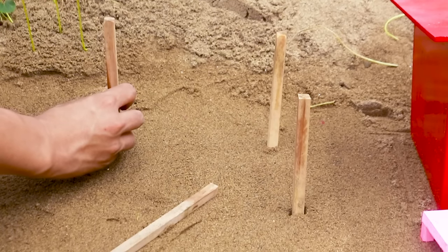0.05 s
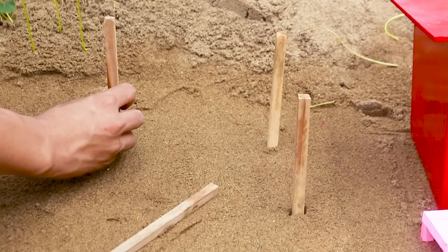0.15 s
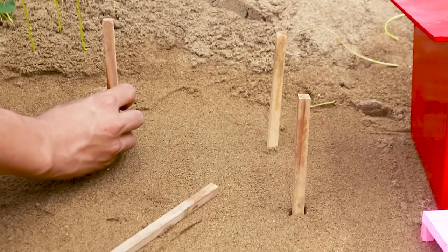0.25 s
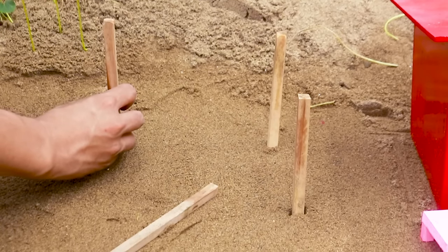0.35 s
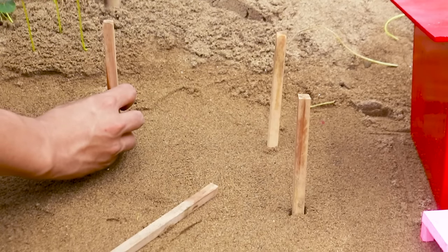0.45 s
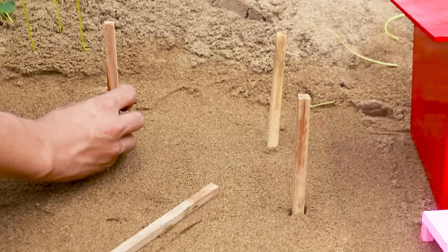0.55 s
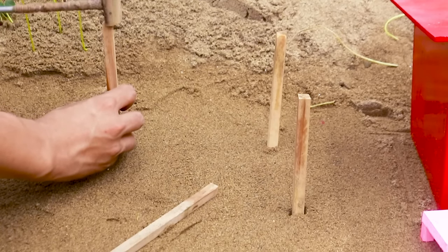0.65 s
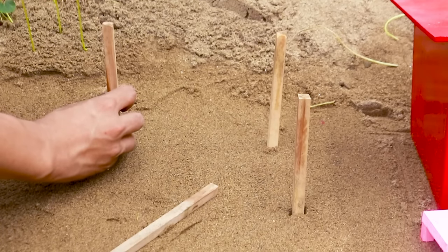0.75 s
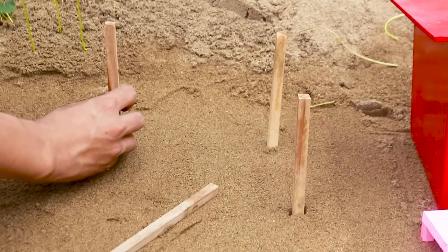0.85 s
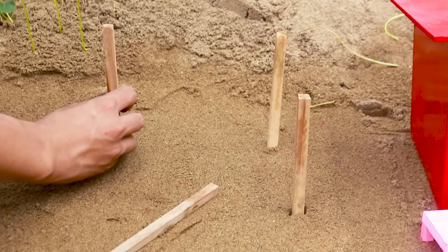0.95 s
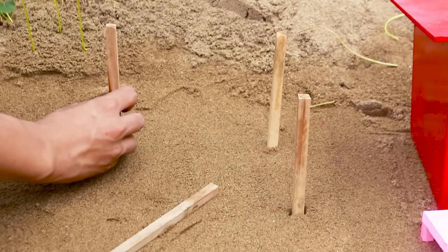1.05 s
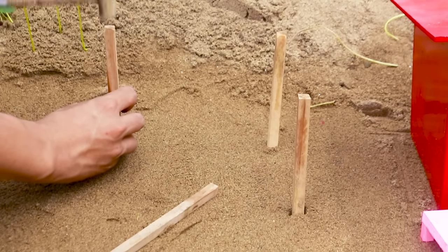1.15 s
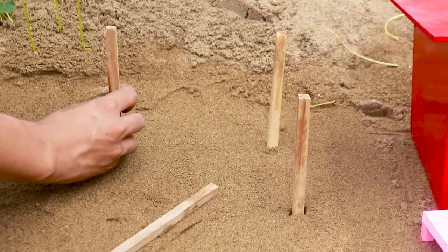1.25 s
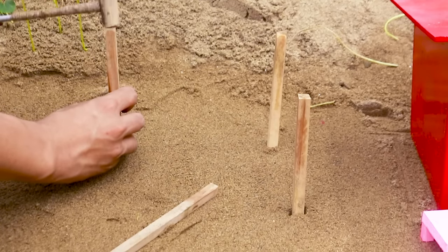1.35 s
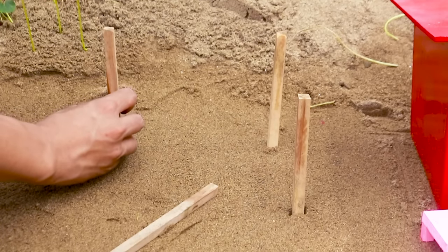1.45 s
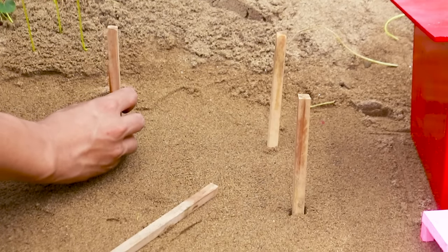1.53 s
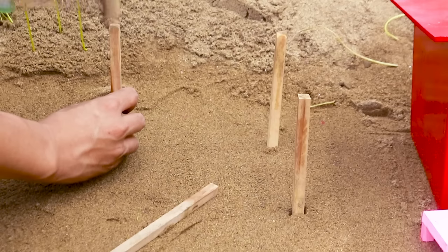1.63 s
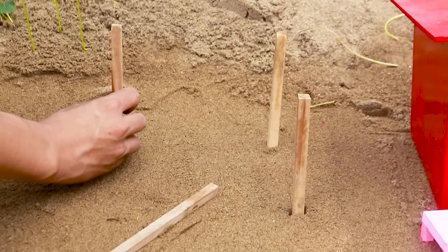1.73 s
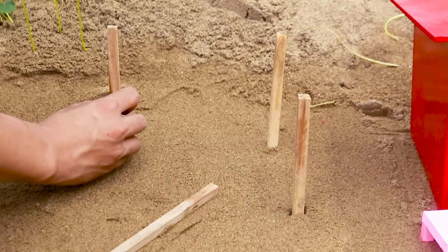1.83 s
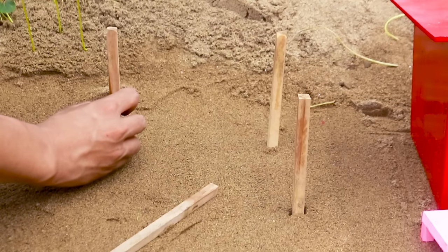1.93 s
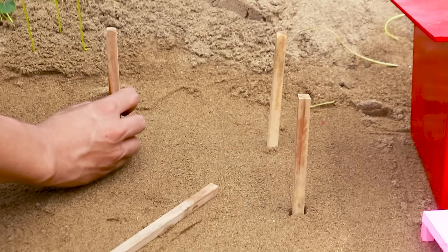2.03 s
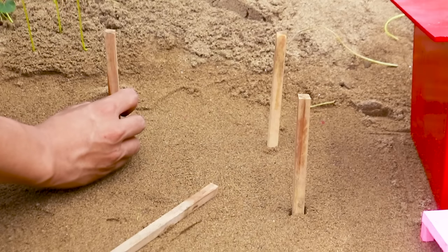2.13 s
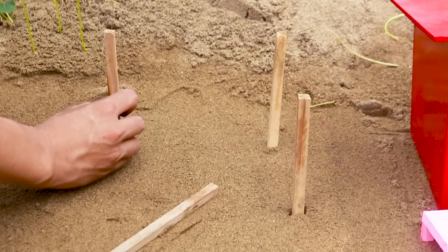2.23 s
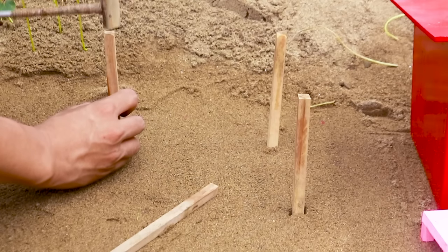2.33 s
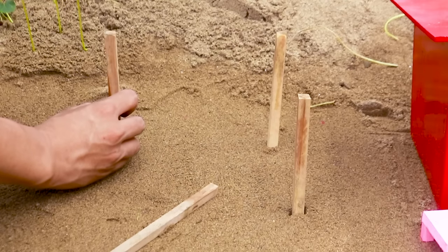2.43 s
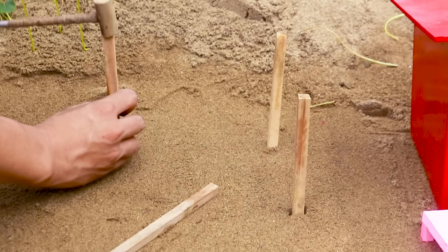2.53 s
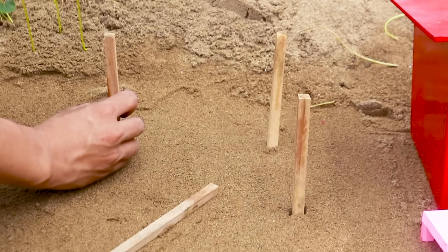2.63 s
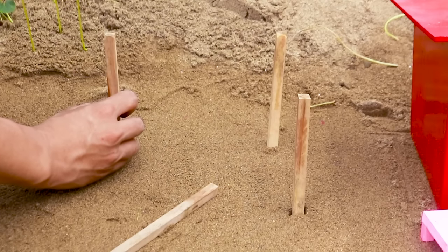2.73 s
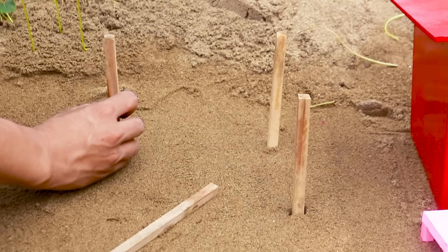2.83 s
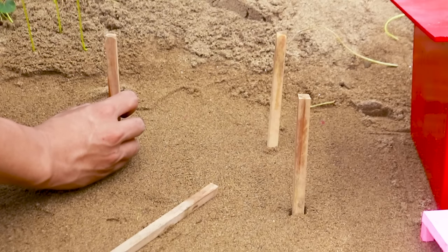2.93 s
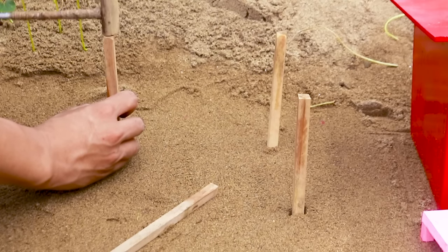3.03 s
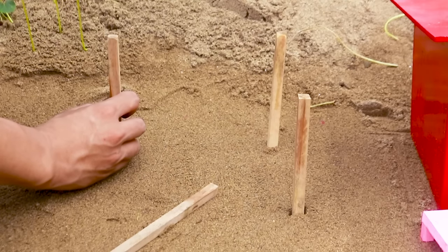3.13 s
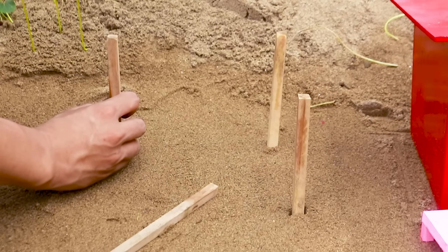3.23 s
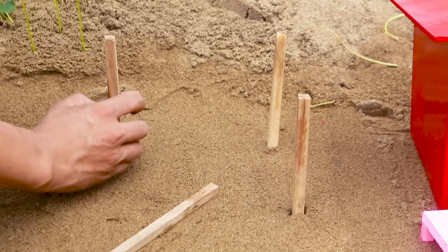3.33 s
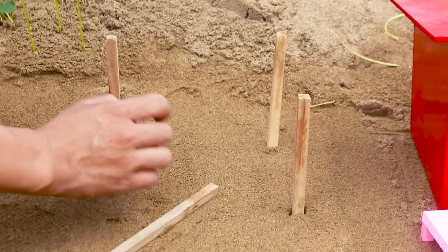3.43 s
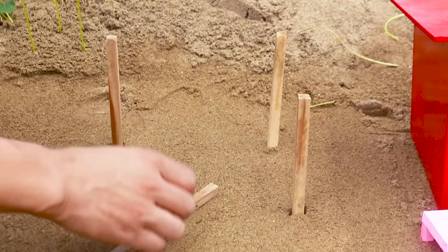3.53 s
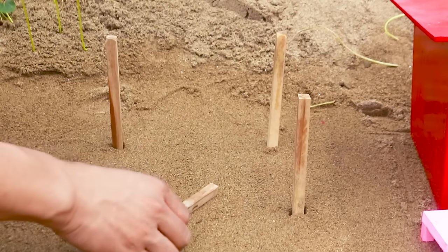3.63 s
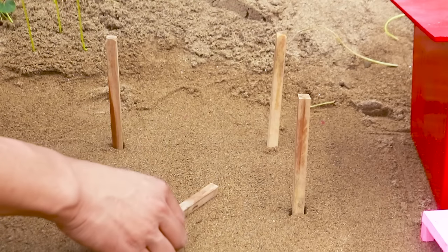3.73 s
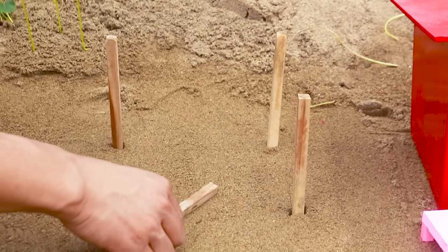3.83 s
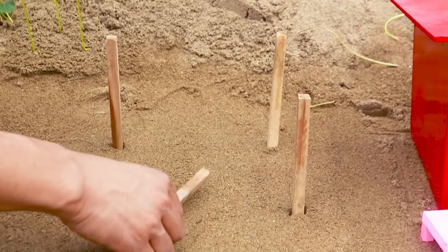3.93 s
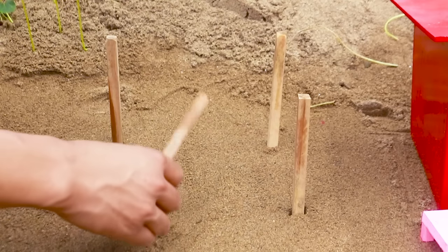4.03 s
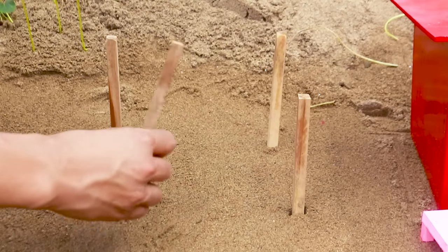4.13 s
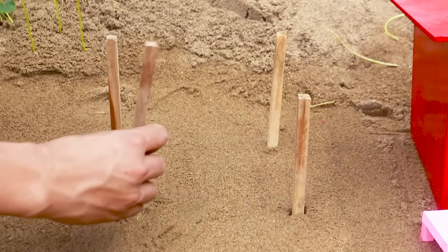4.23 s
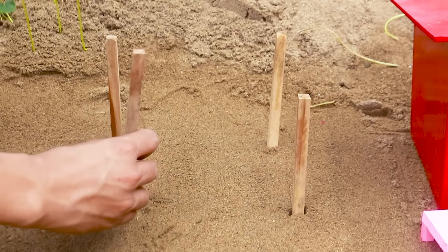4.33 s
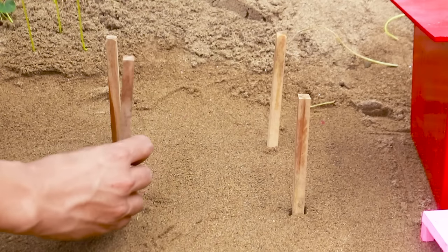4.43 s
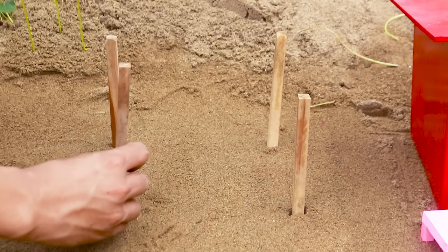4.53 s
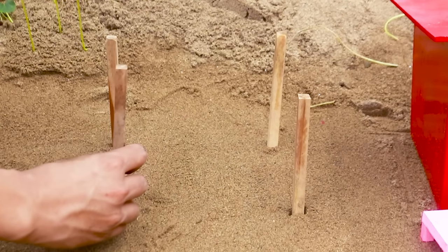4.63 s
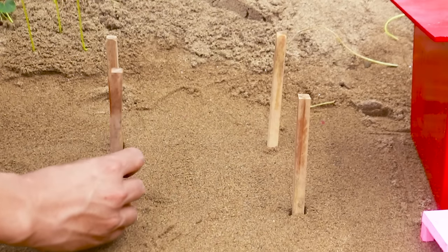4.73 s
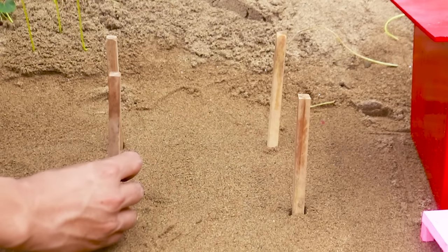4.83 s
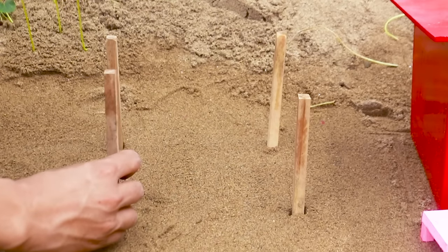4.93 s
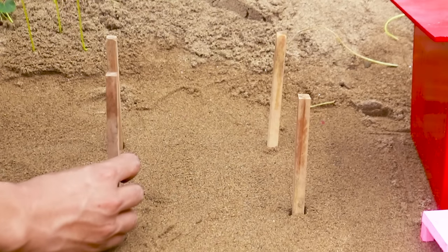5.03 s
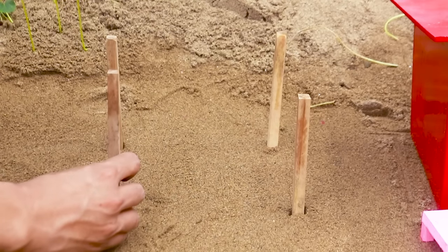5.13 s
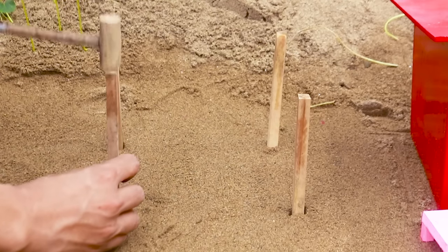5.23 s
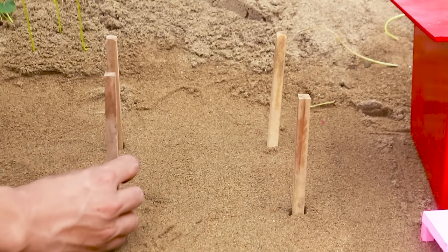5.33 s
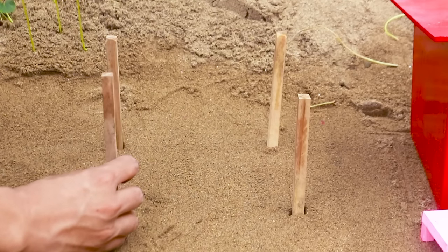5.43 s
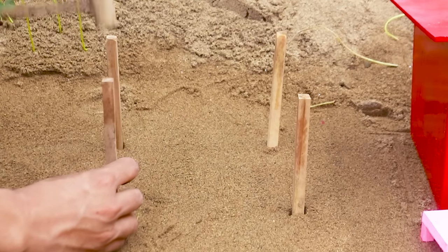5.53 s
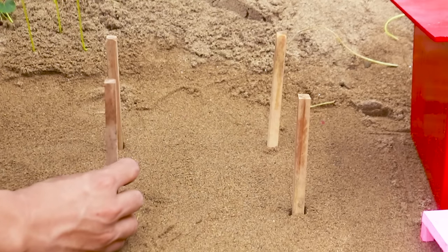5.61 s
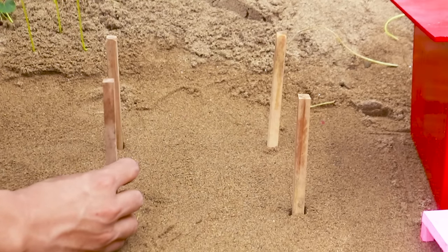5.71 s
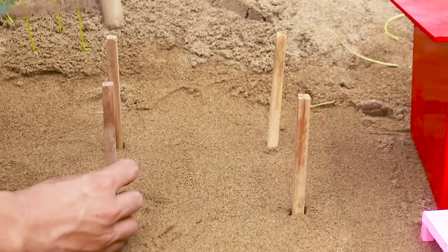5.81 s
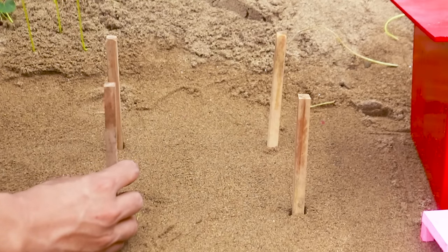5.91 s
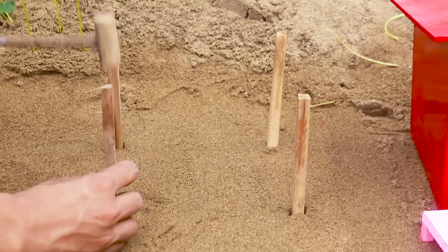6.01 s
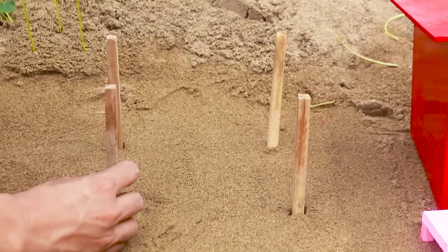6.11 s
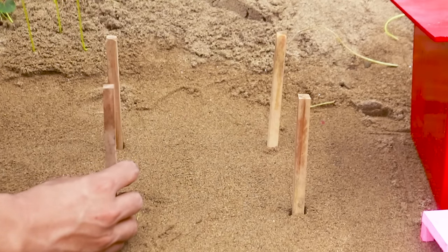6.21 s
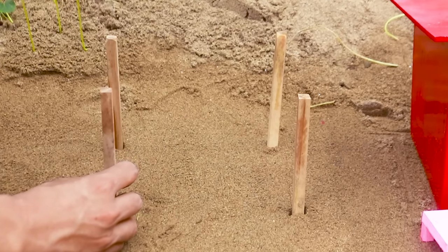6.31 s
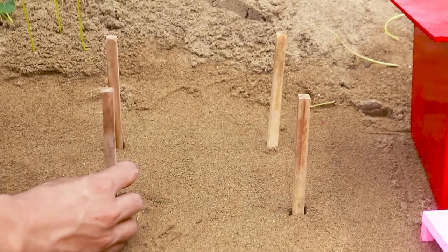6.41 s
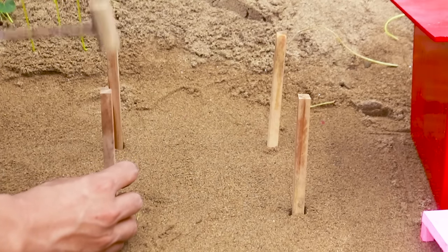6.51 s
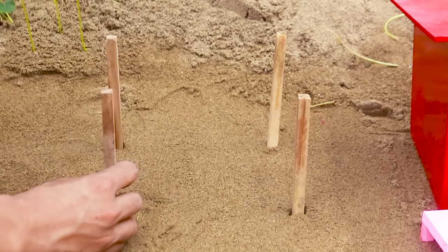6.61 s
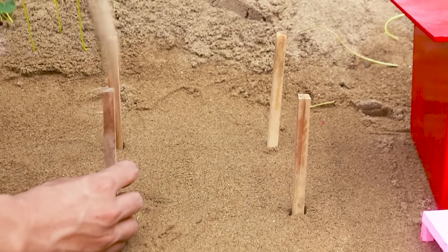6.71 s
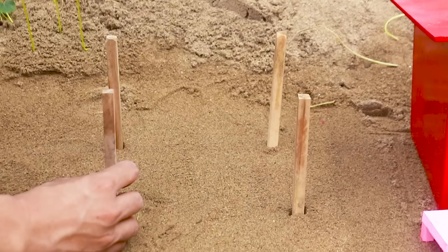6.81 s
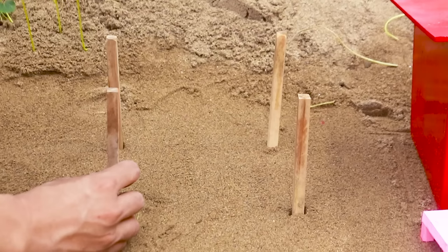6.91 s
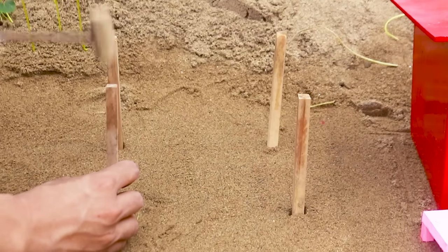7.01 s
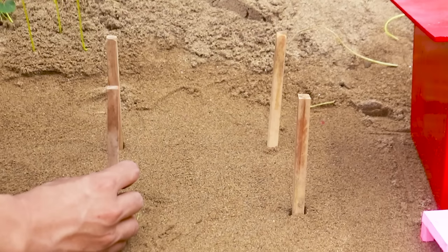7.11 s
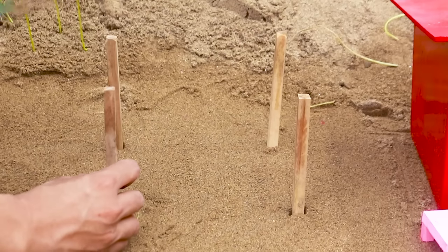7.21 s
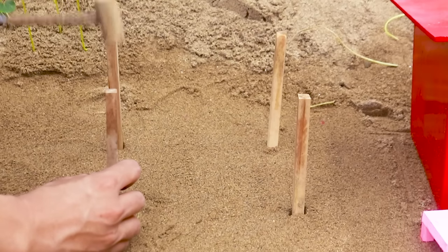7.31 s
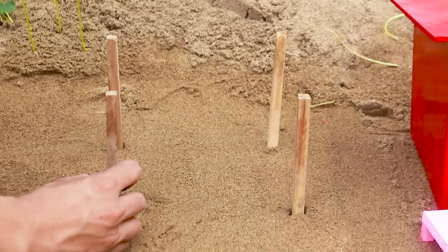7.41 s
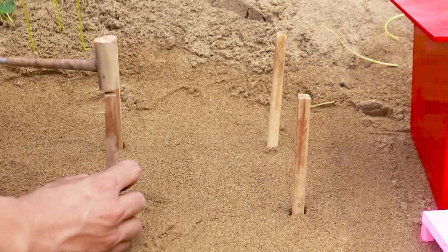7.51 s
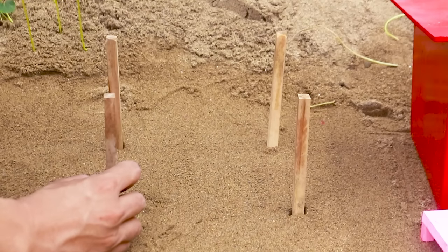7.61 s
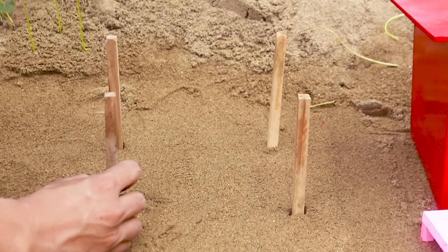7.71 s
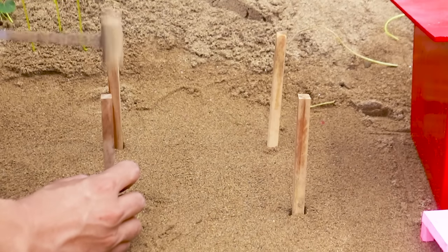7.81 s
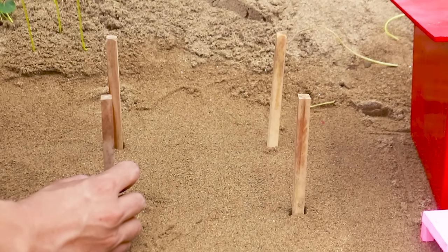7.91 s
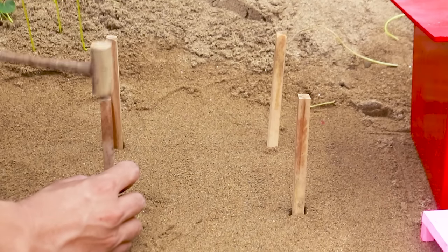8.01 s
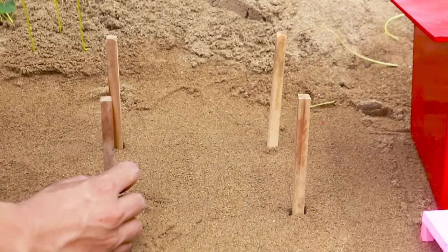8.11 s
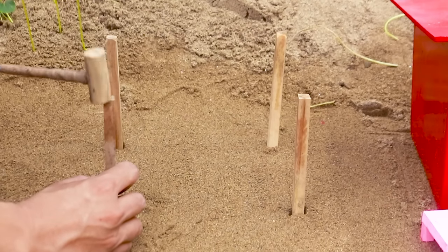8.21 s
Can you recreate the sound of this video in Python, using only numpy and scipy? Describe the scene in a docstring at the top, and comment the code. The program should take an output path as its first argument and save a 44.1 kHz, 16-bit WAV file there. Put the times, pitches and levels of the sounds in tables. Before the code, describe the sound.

Close to the microphone, a small wooden mallet raps a stake into sand, about four sharp, woody knocks a second, each with a short low thump. After three seconds it stops; faint bird whistles and distant traffic show through, with one soft knock as another stake is set down. Past five seconds the tapping resumes, a little slower to start, and runs to the end. Outdoors, wide stereo, loud peaks slightly crushed.

```python
"""Mallet on stakes in sand

A small wooden mallet taps stakes into a bed of sand, close to a microphone whose input clips softly.
Blows: noise crack, decaying sines for wood and bed, a low boom with five weaker returns, scattered noise.
Birds: swept sines whistle, narrow noise buzzes. Dry ticks and a soft knock come between.
Background: shaped noise for distant traffic and far rustle and chatter, plus two wavering hum tones.
"""
import sys
import numpy as np
from scipy import signal
from scipy.fft import rfft, irfft, next_fast_len
from scipy.io import wavfile
from scipy.ndimage import uniform_filter1d, map_coordinates

SR = 44100
rng = np.random.default_rng(int(sys.argv[2]) if len(sys.argv) > 2 else 0)


def file_out(sig):
    """Save sig as 16-bit WAV at sys.argv[1]."""
    # one column per channel
    cols = np.atleast_2d(sig).T
    # limit, then scale
    lim = np.clip(cols, -1, 1)
    pcm = np.round(lim * 32767).astype(np.int16)
    wavfile.write(sys.argv[1], SR, pcm)


N = 364266

# Blows: t/s, crack level/dB, force level/dB, click f/Hz (set by contact spot), snap level/dB (square hit)
BLOWS = [(-.006, -9, -4.5, 2880, -15), (0.2003, -12, -2.2, 1960, 5), (0.4488, -15, -6.5, 1460, -26),
         (0.6877, -8.5, -5, 1600, -20), (0.934, -11.5, -7, 1550, -18), (1.1849, -10.5, -2.5, 1940, 10),
         (1.4026, -10, -0.3, 2640, -4), (1.6213, -12, -1, 2560, -21), (2.1055, -8.5, 1, 2880, -2),
         (2.3397, -5.5, -0.7, 1510, -3), (2.5674, -7.5, -1, 1928, 2), (2.7855, -7, 1.5, 1600, -2),
         (3.0197, -5, -.5, 1537, 1.5), (5.2316, -8, -6, 1550, -16), (5.536, -12.5, -7.5, 1540, -19),
         (5.8065, -8.5, -3, 1950, 6), (6.0434, -11, .1, 2710, -3), (6.2624, -11, -1.5, 2450, -16),
         (6.5133, -7, 1.3, 1510, -8), (6.767, -5, -0.1, 1590, -3), (7.0136, -7, -0.7, 1960, 7),
         (7.2901, -7.5, 1, 2870, -12), (7.519, -10.5, .1, 2650, 0), (7.7767, -10.5, -1.5, 2450, -19),
         (8.0281, -7, 1.1, 2870, -12), (8.2415, -8.5, -1.5, 1600, -20)]
BOOM_DB_PER_FORCE_DB = 0.42
PITCH_PER_DB, PITCH_SD = 0.01, .05  # harder blows tend to ring the wood higher


def mallet():
    """Each blow drives crack, wood, bed, boom and scatter; a faint noise swells just before it."""
    out = np.zeros((2, N))
    t = np.arange(SR // 2) / SR
    low = boom(t)
    sideways = sway(t)
    same = scatter(t)  # shared by all blows: the surroundings answer much alike
    for s, crack_db, force_db, click_hz, snap_db in BLOWS:
        pitch = 1 + PITCH_PER_DB * force_db + rng.normal(0, PITCH_SD)
        strike = crack(t, snap_db) + click(t, click_hz) + 1.03 * wood(t, pitch)
        around = amp(-12.5) * same + amp(-15.0) * scatter(t)
        body = bed(t, click_hz) + sideways + around
        blow = amp(crack_db) * strike + amp(force_db) * body
        blow = blow + amp(BOOM_DB_PER_FORCE_DB * force_db) * low
        add(out, s, blow, .6)
        add_lead(out, s)
    add_bounces(out)
    return out


# Crack spectrum: f/Hz, relative level/dB
CRACK = [(200, -38.5), (600, 4.5), (1500, 4.5), (3000, -0.5), (6000, -9), (10000, -17), (14000, -33)]
# Stereo spread of crack, lead and scatter: f/Hz, left-right likeness (-1 to 1)
SPREAD = [(100, 0.62), (200, 0.21), (400, 0.7), (2000, 0.61), (5000, 0.63), (12000, 0.22)]


def crack(t, snap_db):
    """Impact noise with a fast and a slow decay; its difference adds the treble of a hard, square hit."""
    decay = amp(-60 * t / 0.0084) + 0.27 * amp(-60 * t / 0.046)
    noise = paired(rng.standard_normal((2, len(t))), CRACK, SPREAD) * decay
    snap = amp(snap_db) * np.diff(noise, prepend=0)
    return 2.46 * noise + snap


def add_lead(out, s):
    """A faint noise swells exponentially for 5 ms just before each blow."""
    lead = np.arange(-SR // 200, 0) / SR
    noise = paired(rng.standard_normal((2, len(lead))), CRACK, SPREAD)
    add(out, s + lead[0], amp(-22.5 + 60 * lead / 0.0096) * noise)


def click(t, hz):
    """Short decaying sine; the contact spot sets its pitch."""
    return 1.46 * amp(-60 * t / 0.022) * np.sin(2 * np.pi * hz * t)


# Mallet head and stake modes: f/Hz at pitch 1, mean level/dB, t60/s
WOOD = [(1576, -6, 0.065), (1694, -10.5, 0.051), (1938, -9.5, 0.089), (2512, -13, 0.07), (2922, -12, 0.073),
        (3530, -18, 0.079), (4600, -18.5, 0.051)]


def wood(t, pitch):
    """Head and stake ring as decaying sines, at new strengths each time."""
    hz, db, t60 = np.transpose(WOOD)[:, :, None]
    level_db = db + rng.normal(0, 2.3, db.shape)
    modes = amp(level_db - 60 * t / t60) * np.sin(2 * np.pi * hz * pitch * t)
    return modes.sum(0)


# Bed and surroundings, nominal modes: f/Hz, level/dB, swell time/s, t60/s
BED = [(158.95, -19.5, 0.032, 0.34), (213, -32.5, 0.051, 0.18), (259.7, -23.5, 0.058, 0.12),
       (317.8, -30, 0.045, 0.21), (368.9, -21.5, 0.048, 0.12), (393.7, -8.5, 0.0034, 0.099),
       (435.6, -25.5, 0.051, 0.16), (489.9, -23.5, 0.035, 0.09), (572, -38.5, 0.013, 0.095),
       (636, -25.5, 0.0017, 0.15), (708, -35.5, .02, 0.056), (795, -22, 0.008, 0.17),
       (861, -24, 0.004, 0.28), (943.5, -16.5, 0.023, 0.078), (992.4, -15.5, 0.0087, 0.11),
       (1100, -32.5, 0.0071, 0.043), (1208, -29, .01, 0.047)]
# Bed gain above 600 Hz against click pitch: click f/Hz, level/dB
HOLLOW = [(1700, -2), (1900, -8.5), (2000, -13), (2450, 1.5)]
BED_DETUNE_SD = .012  # share of f


def bed(t, click_hz):
    """Modes swell, then decay; pitch and strength shift a little at each blow."""
    hz, db, swell_s, t60 = np.transpose(BED)[:, :, None]
    envelope = amp(db - 60 * t / t60 + 60 * swell_s / t60) * (1 - np.exp(-(t / swell_s) ** 2))
    strength = amp(rng.normal(0, 2, hz.shape) + along(HOLLOW, click_hz) * (hz > 600))
    tuned_hz = hz * rng.normal(1, BED_DETUNE_SD, hz.shape)
    return (strength * envelope * np.sin(2 * np.pi * tuned_hz * t)).sum(0)


# Cross modes: f/Hz, level/dB, t60/s
SWAY = [(133, -23.5, .35), (165, -18.5, 0.28), (216, -27, .25), (300, -32, .2)]


def sway(t):
    """Cross modes push left and right in opposite directions."""
    swell = 1 - np.exp(-(t / 0.028) ** 2)
    modes = sum(amp(db - 60 * t / t60) * swell * np.sin(2 * np.pi * hz * t) for hz, db, t60 in SWAY)
    return [[1], [-1]] * modes


# Thumps inside the boom: middle t/s after the blow, f/Hz, level/dB, length/s, L-R/dB
THUMPS = [(.007, 374, -12, .012, 1), (.006, 614, -17.5, 0.024, -4.5), (.022, 222, -16.5, .014, -1),
          (.042, 185, -9, 0.011, 5), (.06, 241, -21, 0.019, 3.5), (0.091, 150, -23, 0.0089, 11.5),
          (.1, 63.9, -29, 0.23, .5)]
BOOM_MIDDLE_S, BOOM_HZ, BOOM_DB, BOOM_LENGTH_S, BOOM_PAN_DB = 0.0329, 100.3, -18, 0.088, 2
RETURN_S, RETURN_GAP_S, RETURN_LENGTH_S = .1, .05, 0.06
RETURN_LOSS_DB, RETURN_PITCH_RATIO = 3, 0.933  # per return; pitch sinks from the second on


def boom(t):
    """Low swell through the ground, five weaker returns that sink in pitch, and short thumps."""
    swells = [(BOOM_MIDDLE_S, BOOM_HZ, BOOM_DB, BOOM_LENGTH_S, BOOM_PAN_DB)]
    for k in range(5):
        hz = BOOM_HZ * RETURN_PITCH_RATIO ** k
        db = BOOM_DB - RETURN_LOSS_DB * (k + 1)
        swells.append((RETURN_S + k * RETURN_GAP_S, hz, db, RETURN_LENGTH_S, BOOM_PAN_DB))
    out = np.zeros((2, len(t)))
    for s, hz, db, length, pan_db in swells + THUMPS:
        window = np.cos(np.pi * np.clip((t - s) / length, -.5, .5)) ** 2
        gain = amp(db + np.array([[pan_db], [-pan_db]]) / 2)
        out += gain * window * np.cos(2 * np.pi * hz * (t - s))
    return out


# Scatter spectrum: f/Hz, relative level/dB
SCATTER = [(80, -32.5), (170, -2), (300, 3), (500, 2), (1000, -2), (2000, -11), (4000, -19.5),
           (8000, -25.5), (14000, -35.5)]
# Scatter decay: f/Hz, t60/s
DYING = [(100, 0.66), (300, 0.26), (1000, 0.24), (3000, 0.2), (8000, 0.12), (14000, 0.12)]


def scatter(t):
    """Sound thrown back from all around; each frequency dies at its own speed, the bass swells late."""
    pair = paired(rng.standard_normal((2, len(t))), SCATTER, SPREAD)
    hz, u, z = signal.stft(pair, SR, nperseg=256)
    swell = 1 - np.exp(-u * (hz[:, None] + 50) / 6)
    decay = amp(-60 * u / along(DYING, hz)[:, None])
    # random patches of gain roughen the tail
    uneven_db = 3.5 * unit(uniform_filter1d(rng.standard_normal(z.shape[1:]), size=4, axis=0))
    tail = signal.istft(z * amp(uneven_db) * swell * decay, SR, nperseg=256)[1]
    return tail[:, :len(t)] * (1 - np.exp(-t / 0.00096))


# Head touches the stake again: t/s, level/dB
BOUNCES = [(1.461, -20), (6.101, -22), (7.577, -20)]
BOUNCE_HZ, BOUNCE_T60_S, BOUNCE_PITCH = 1870, .045, .7  # a light touch rings the wood lower


def add_bounces(out):
    """Light touches: a decaying sine and lowered wood modes with a soft onset."""
    t = np.arange(SR // 2) / SR
    for s, db in BOUNCES:
        envelope = amp(db - 60 * t / BOUNCE_T60_S) * (1 - np.exp(-t / .002))
        ring = np.sin(2 * np.pi * BOUNCE_HZ * t) + wood(t, BOUNCE_PITCH)
        add(out, s, envelope * ring)


def birds():
    """Whistles and buzzes, blurred by a short decaying-noise echo of the trees."""
    whistles, buzz = np.zeros((2, N)), np.zeros((2, N))
    add_verses(whistles)
    add_held(whistles)
    add_chirps(whistles)
    add_sweep(whistles)
    add_buzzes(buzz)
    t = np.arange(SR // 4) / SR
    trees = rng.standard_normal((2, len(t))) * amp(-60 * t / 0.32)
    trees = trees / np.linalg.norm(trees[0])
    echo = signal.fftconvolve(whistles + 0.5 * buzz, trees, axes=1)[:, :N]
    return whistles + amp(-0.5) * echo + buzz


# Four-note verse: delay/s, length/s, first f/Hz, middle f/Hz, last f/Hz, level re verse/dB, L-R/dB
VERSE = [(0, .045, 2870, 3229, 3350, -3.5, 4), (0.051, .028, 2360, 2130, 1860, -1, -5.5),
         (.203, .03, 2590, 2470, 2530, -4.5, 10), (.238, 0.05, 3020, 2710, 2740, 3.5, 1.5)]
# Verse repeats: t/s, mean level/dB
VERSES = [(.786, -50), (1.108, -49.5), (1.43, -49), (1.744, -49), (2.061, -49)]


def add_verses(out):
    """One bird repeats a verse of curved whistles, its note levels varying."""
    for s, verse_db in VERSES:
        for delay, length, first, middle, last, db, pan_db in VERSE:
            level_db = verse_db + db + rng.normal(0, 1.5)
            whistle(out, s + delay, length, arc(first, middle, last), level_db, pan_db)


# Long whistles: start t/s, length/s, mean f/Hz, level/dB
HELD = [(1.07, 0.11, 1424, -53.5), (4.17, 0.2, 4015, -57.5), (4.555, 0.33, 3952, -54.5),
        (4.955, 0.28, 3880, -55), (6.175, 0.27, 6220, -67), (6.2, 0.267, 5140, -58),
        (6.48, 0.36, 5100, -60), (6.82, 0.23, 5060, -55), (7.235, .055, 3000, -62), (7.42, .085, 4480, -48),
        (7.744, 0.049, 4490, -48.5), (7.845, .035, 7870, -59), (8.07, .1, 3970, -50)]
SAG_PER_S = 0.043  # share of pitch lost


def add_held(out):
    """Nearly level whistles that sag slowly in pitch."""
    for s, length, hz, db in HELD:
        whistle(out, s, length, lambda u: hz * (1 - SAG_PER_S * length * (u - .5)), db)


# Slurred chirps: start t/s, length/s, first f/Hz, last f/Hz, level/dB, L-R/dB
CHIRPS = [(.14, .05, 3600, 2900, -64, 0), (0.366, 0.023, 4200, 5200, -66, 0),
          (1.306, .093, 6500, 7600, -66, -2), (2.05, .045, 5070, 5650, -59, 3),
          (2.23, .045, 3500, 3900, -51, -4), (2.289, .057, 3720, 4270, -55, -1),
          (2.9, .07, 3630, 3170, -59, -3), (3.285, .027, 7800, 7200, -61, 2),
          (4.741, .048, 2870, 3100, -61.5, 1), (4.894, .055, 6900, 7600, -65, 0),
          (5.334, .03, 7900, 6800, -56, 0), (5.612, 0.032, 4460, 3820, -60, 0),
          (5.74, 0.018, 3600, 4620, -54, -5), (5.97, .03, 4400, 3620, -61, 0),
          (6.215, .03, 4600, 3740, -58, 0), (6.71, .03, 3800, 6400, -62, 0),
          (6.987, .035, 4240, 3900, -53, -4), (7.868, .012, 4300, 3300, -52, 0),
          (7.876, .02, 3350, 3300, -53, 0), (7.964, .086, 7030, 7200, -43, -2),
          (7.97, .051, 8150, 6400, -52, 0), (8.115, 0.089, 8920, 6140, -47, 5)]
# Far birds, random limits; one (low, high) row each: t/s, length/s, first f/Hz, last/first f ratio,
# level/dB, L-R/dB
FAR_CHIRPS = [(0, 8.2), (.02, .07), (3200, 6800), (.8, 1.25), (-78, -69), (-6, 6)]
BEND = .55  # share of the slur done at half time


def add_chirps(out):
    """Short whistles slurred along a curve, plus 40 faint ones of far birds at random."""
    low, high = np.transpose(FAR_CHIRPS)
    far = [(s, length, hz, hz * slur, db, pan_db)
           for s, length, hz, slur, db, pan_db in rng.uniform(low, high, size=(40, 6))]
    for s, length, first, last, db, pan_db in CHIRPS + far:
        middle = first + BEND * (last - first)
        whistle(out, s, length, arc(first, middle, last), db, pan_db)


# One loud rising call: t/s, f/Hz
SWEEP = [(2.437, 4130), (2.474, 4660), (2.516, 5620), (2.536, 7300), (2.554, 7720), (2.575, 7900)]
SWEEP_DB = -40.5


def add_sweep(out):
    """One whistle rises through a pitch contour."""
    s, hz = np.transpose(SWEEP)
    length = s[-1] - s[0]
    whistle(out, s[0], length, lambda u: np.interp(s[0] + u * length, s, hz), SWEEP_DB)


def whistle(out, start, length, shape, db, pan_db=0):
    """One pure note that flutters and fades; shape gives Hz over the note's 0-1."""
    u = np.linspace(0, 1, round(length * SR))
    hz = shape(u) * (1 + 0.004 * wobble(30, len(u)))
    flutter_db = 1.5 * wobble(30, len(u)) - 25 * length * (u - .5)  # long notes fade
    envelope = amp(db + flutter_db) * np.sin(np.pi * u ** 0.67) ** .35
    add(out, start, envelope * np.sin(2 * np.pi * np.cumsum(hz) / SR), pan_db)


def arc(*hz):
    """Parabola through first, middle and last Hz."""
    return np.poly1d(np.polyfit([0, .5, 1], hz, 2))


# Buzzy notes: start t/s, end t/s, f/Hz, width/Hz, level/dB, L-R/dB
BUZZES = [(0.249, .43, 7470, 250, -70, 0), (.3, .44, 4770, 1500, -64, 0),
          (2.348, 2.566, 5560, 2300, -50.5, 1), (3.05, 3.413, 5280, 303, -72, -1),
          (3.44, 3.6, 4400, 400, -70, -1), (3.62, 4.062, 5460, 400, -71, -0.5),
          (3.8, 4.149, 3360, 250, -71, -1), (4.45, 4.602, 7150, 200, -71, 2),
          (4.896, 4.964, 7700, 1500, -64, 2), (5.299, 5.533, 3350, 400, -63, 2),
          (5.359, 5.53, 4800, 3700, -60.5, -1), (5.6, 5.805, 4150, 970, -62, -2),
          (7.031, 7.801, 4220, 80, -55, 1), (7.05, 8.24, 4510, 161, -60.5, 0),
          (7.083, 7.775, 6960, 773, -60, -1), (8.062, 8.239, 7140, 1500, -51, 2)]
# Sharp calls: t/s, f/Hz, level/dB, L-R/dB
CHIPS = [(1.92, 3470, -50.5, -1), (2.388, 4600, -40, 7), (4.391, 3580, -39, 1), (7.929, 3600, -38.5, 2)]
# Parts of a sharp call (burst, higher burst, wide spray): delay/s, length/s, f ratio, width/Hz,
# level re call/dB
CHIP = [(0, 0.012, 1, 800, -0.5), (.006, .016, 1.13, 650, -6.5), (-.006, .04, 1.6, 6500, -19)]


def add_buzzes(out):
    """Buzzy notes and sharp calls: enveloped noise in Gaussian bands."""
    chips = [(s + delay, s + delay + length, hz * ratio, width, db + part_db, pan_db)
             for s, hz, db, pan_db in CHIPS for delay, length, ratio, width, part_db in CHIP]
    for start, end, hz, width, db, pan_db in BUZZES + chips:
        u = np.linspace(0, 1, round((end - start) * SR))
        noise = rng.standard_normal((2, len(u)))
        band = filtered(noise, lambda f: np.exp(-((f - hz) / width) ** 2 * 2))
        add(out, start, amp(db) * np.sin(np.pi * u) ** 0.33 * unit(band), pan_db)


# Dry ticks: t/s, level/dB (0.5 dB trim follows), L-R/dB
TICKS = [(0.3628, -33, -0.5), (0.5766, -38, 3.0), (0.6356, -30.5, 2.0), (0.6552, -30.5, 0.5),
         (3.3333, -46, 6), (5.1978, -31, 1), (5.4494, -41, -0.5), (8.209, -30, 1.0)]


def ticks():
    """Single dry ticks: bare exponential pulses."""
    out, t = np.zeros((2, N)), np.arange(SR // 10) / SR
    for s, db, pan_db in TICKS:
        add(out, s, amp(db - 0.5 - 60 * t / 0.0027), pan_db)
    return out


# Stake touches down: t/s, f/Hz, level/dB, t60/s
SETDOWN = [(4.23, 650, -31, .022)]


def setdown():
    """Soft knock of a stake set on the sand: three decaying partials."""
    out, t = np.zeros((2, N)), np.arange(SR // 10) / SR
    for s, hz, db, t60 in SETDOWN:
        envelope = amp(db - 60 * t / t60) * (np.exp(-t / 0.00036) - 1)
        partials = sum(gain * np.sin(2 * np.pi * ratio * hz * t)
                       for ratio, gain in [(1, 1), (2.37, 0.18), (3.0, 0.083)])
        add(out, s, envelope * partials, 3)
    return out


# Traffic spectrum: f/Hz, relative level/dB per Hz
TRAFFIC = [(12, -28.5), (20, -5), (38, -2.5), (91, -0.5), (120, -14.5), (146, -12), (181, -12.5),
           (202, -19.5), (229, -14.5), (260, -18), (455, -25), (630, -25.5), (1500, -35), (1950, -73),
           (3300, -120)]
# Stereo spread of traffic and air: f/Hz, left-right likeness (-1 to 1)
ALIKE = [(60, 1), (180, 0.96), (520, 0.58), (1530, -0.18), (4520, -0.19), (13300, 0.91)]


def traffic():
    """Distant rumble: patchy shaped noise, gently swelling."""
    return amp(-39.5 + 0.7 * wobble(6.6, N)) * paired(patchy(1.8), TRAFFIC, ALIKE)


# Hum tones: mean f/Hz, mean level/dB
HUM = [(87, -59.5), (175, -57.5)]


def hum():
    """Sines that waver in level and pitch."""
    out = np.zeros(N)
    for hz, db in HUM:
        gain = amp(db + 1.3 * wobble(1.3, N))
        phase = 2 * np.pi * np.cumsum(hz + 1.7 * wobble(3.6, N)) / SR
        out += gain * np.sin(phase)
    return out


# Far rustle and chatter: t/s, level/dB
AIR_DB = [(0.0, -64), (0.07, -57.5), (0.53, -63.5), (1.38, -57.5), (1.98, -59), (2.51, -51), (3.29, -60),
          (3.86, -64.5), (5.96, -59.5), (6.14, -55.5), (7.77, -56), (8.26, -51)]
# Its spectrum: f/Hz, relative level/dB per Hz
AIR = [(710, -21.5), (1200, -2.5), (1550, -4), (1920, -4.5), (3100, -8.5), (3400, -7), (3920, -8),
       (5440, -14.5), (11200, -33), (13800, -45)]


def air():
    """Far rustle and chatter: patchy shaped noise on a level curve."""
    air_db = np.interp(np.arange(N) / SR, *np.transpose(AIR_DB))
    return amp(air_db) * paired(patchy(2.4), AIR, ALIKE)


def patchy(depth_db):
    """Two white noises with shared time-frequency patches of random gain."""
    z = signal.stft(rng.standard_normal((2, N)), nperseg=512)[2]
    field = uniform_filter1d(rng.standard_normal(z.shape[1:]), size=6, axis=0)
    field = uniform_filter1d(field, size=14, axis=1)
    return signal.istft(z * amp(depth_db * unit(field)), nperseg=512)[1][:, :N]


def wobble(rate_hz, n):
    """Smooth random curve of n samples, rate_hz knots a second."""
    knots = rng.standard_normal(int(n * rate_hz / SR) + 4)
    return map_coordinates(knots, [np.arange(n) * rate_hz / SR])


def paired(noise, spectrum, alike):
    """Colour two noises and mix them to a stereo pair of given likeness, rms 1."""
    def response(hz):
        turn = np.arccos(np.clip(along(alike, hz), -1, 1)) / 2
        return amp(along(spectrum, hz)) * [np.cos(turn), np.sin(turn)]
    mid, side = filtered(noise, response)
    return unit(np.array([mid + side, mid - side]))


def filtered(x, response):
    """x times a response of frequency."""
    n = x.shape[-1]
    m = next_fast_len(n + 4096)
    return irfft(rfft(x, m) * response(np.fft.rfftfreq(m, 1 / SR)), m)[..., :n]


def along(points, hz):
    """Interpolate (Hz, value) points on a log-frequency axis."""
    f, v = np.transpose(points)
    return np.interp(np.log(hz + 1), np.log(f + 1), v)


def add(out, s, sound, pan_db=0):
    """Lay a sound into both channels at time s; pan_db is L-R."""
    i = round(s * SR)
    start = max(i, 0)
    sound = (sound * amp([[pan_db / 2], [-pan_db / 2]]))[:, max(-i, 0):N - i]
    out[:, start:start + sound.shape[1]] += sound


def amp(db):
    """dB to gain."""
    return 10 ** (np.asarray(db) / 20)


def unit(x):
    """Scale to rms 1."""
    return x / np.sqrt(np.mean(x ** 2) + 1e-20)


def scene():
    """Everything at the microphone."""
    return mallet() + birds() + ticks() + setdown() + traffic() + hum() + air()


TOP_HZ, EDGE_HZ = 13700, 900  # band limit, width of the slope below it


def record(dry):
    """The input clips softly, a treble lift follows; nothing is kept above the band limit."""
    clipped = dry / (1 + np.abs(dry / 0.3) ** 5) ** (1 / 5)
    lifted = clipped + 0.18 * np.diff(clipped, prepend=0)
    return filtered(lifted, lambda hz: np.clip((TOP_HZ - hz) / EDGE_HZ, 0, 1))


dry = scene()
out = record(dry)
file_out(out)
```